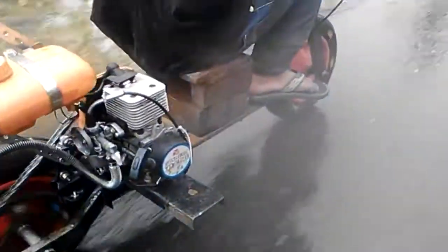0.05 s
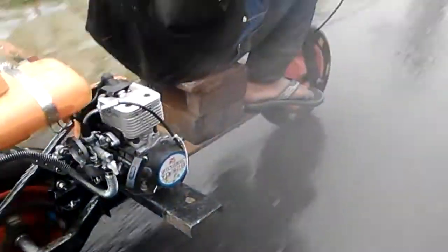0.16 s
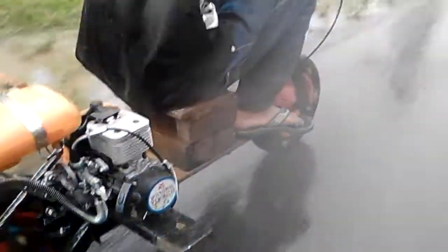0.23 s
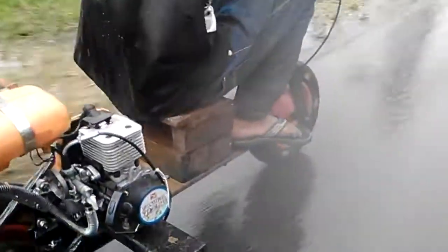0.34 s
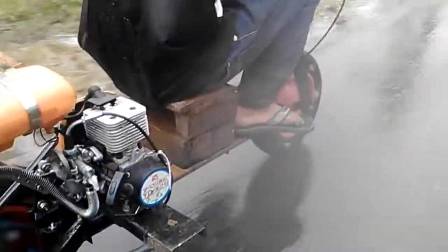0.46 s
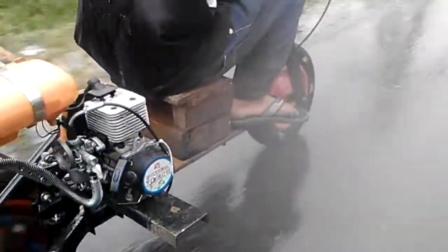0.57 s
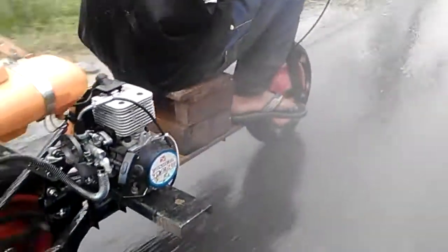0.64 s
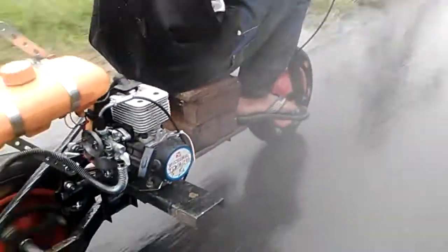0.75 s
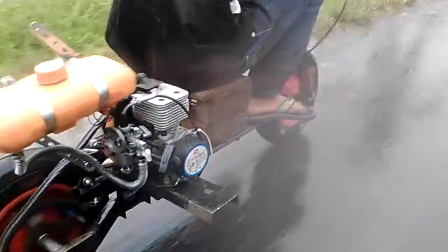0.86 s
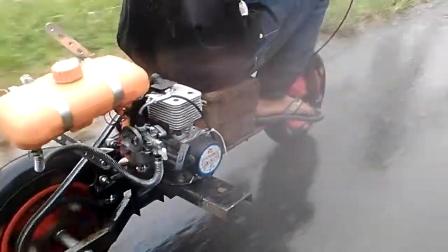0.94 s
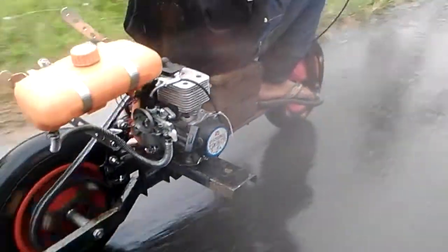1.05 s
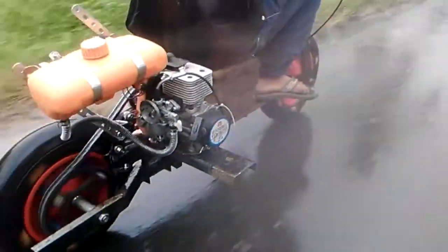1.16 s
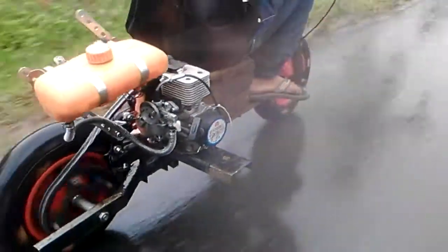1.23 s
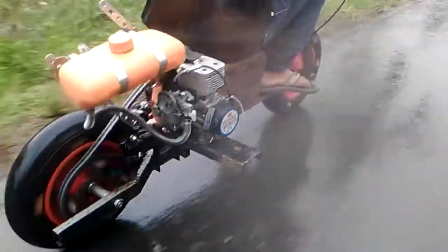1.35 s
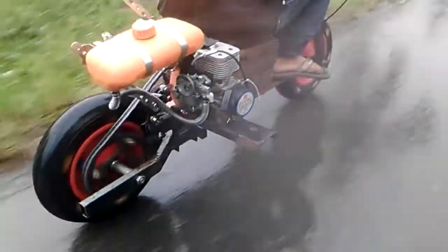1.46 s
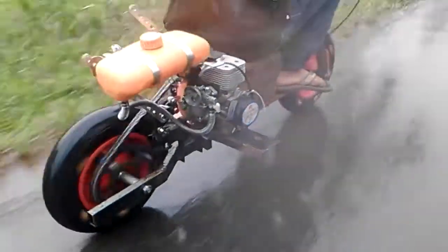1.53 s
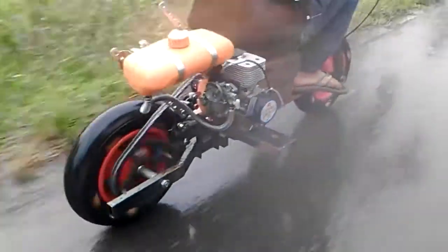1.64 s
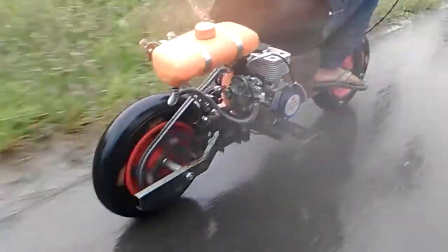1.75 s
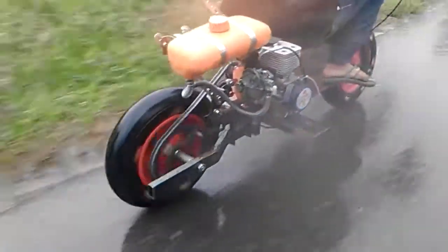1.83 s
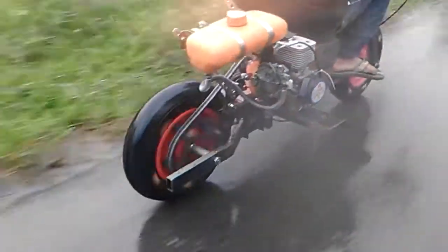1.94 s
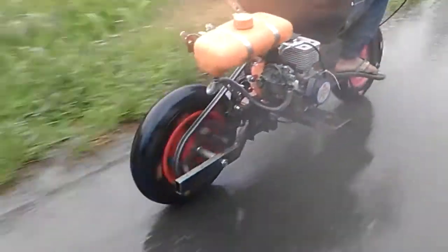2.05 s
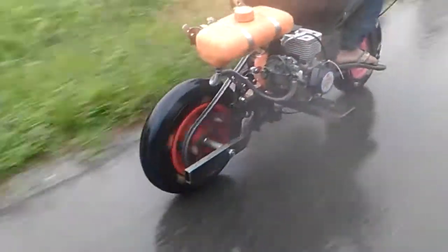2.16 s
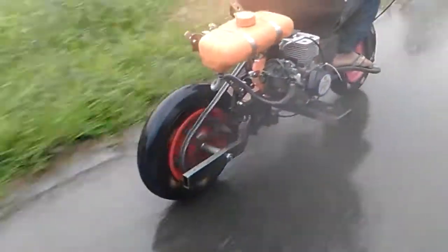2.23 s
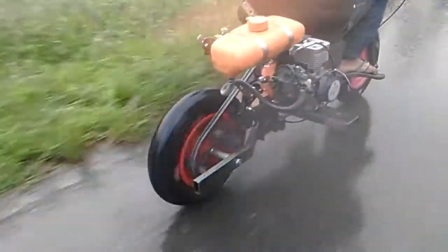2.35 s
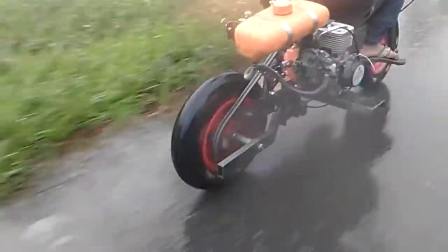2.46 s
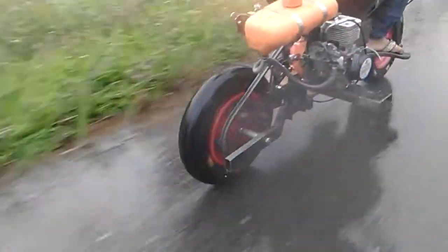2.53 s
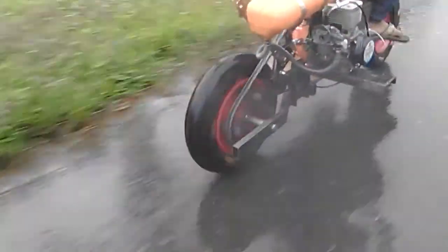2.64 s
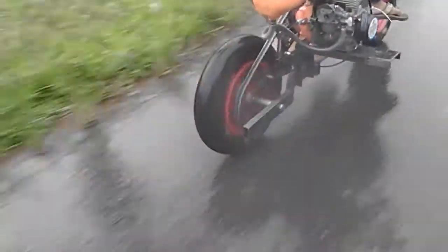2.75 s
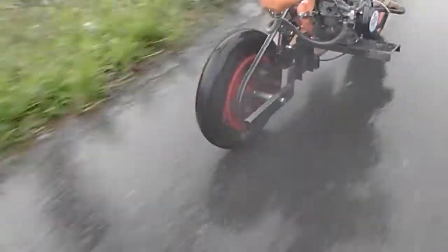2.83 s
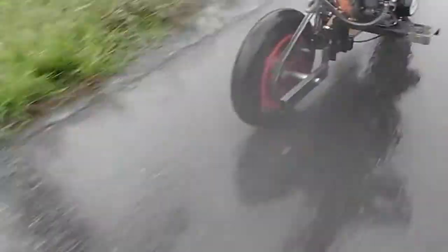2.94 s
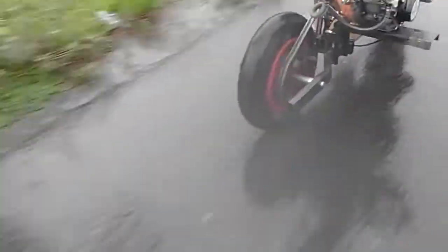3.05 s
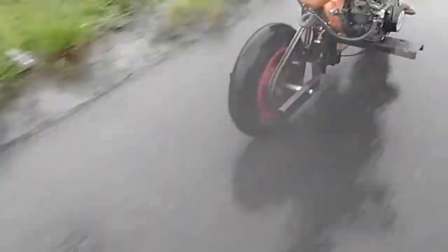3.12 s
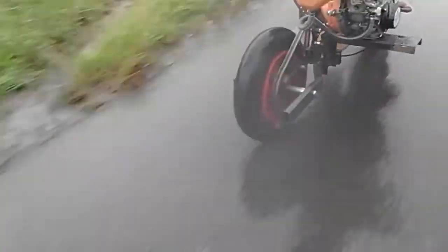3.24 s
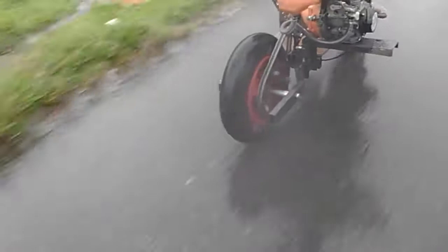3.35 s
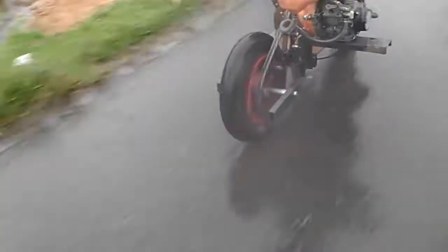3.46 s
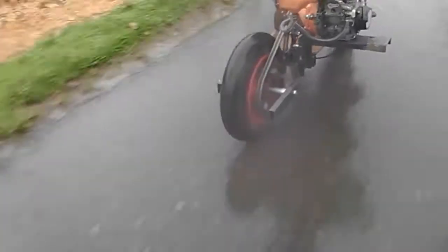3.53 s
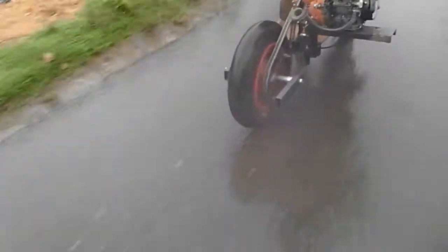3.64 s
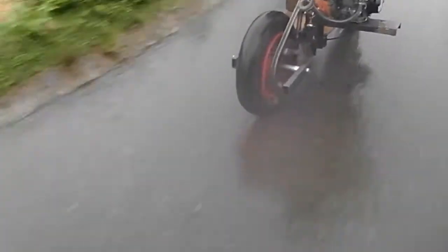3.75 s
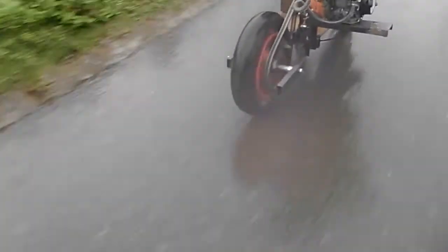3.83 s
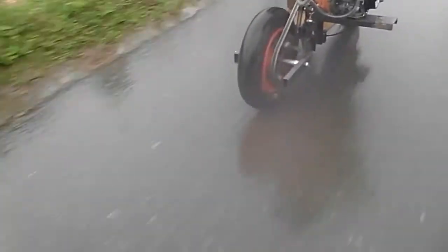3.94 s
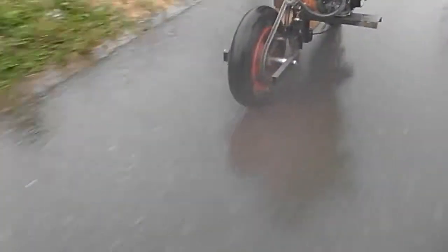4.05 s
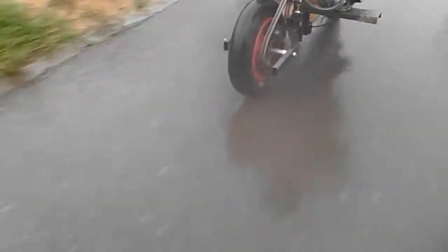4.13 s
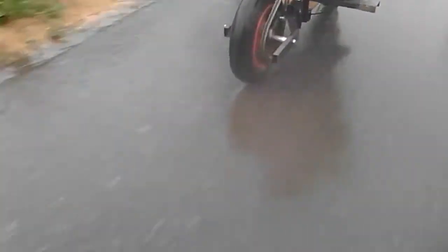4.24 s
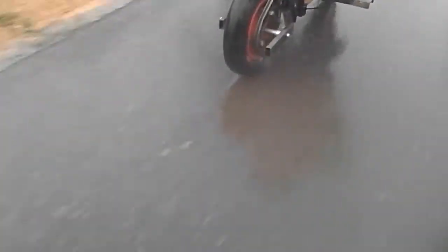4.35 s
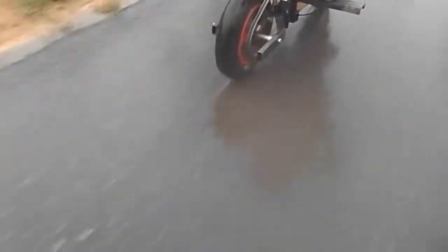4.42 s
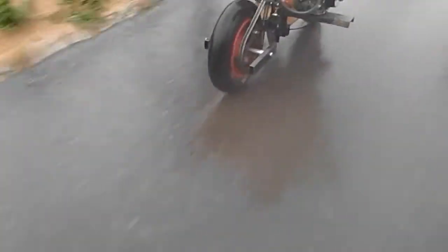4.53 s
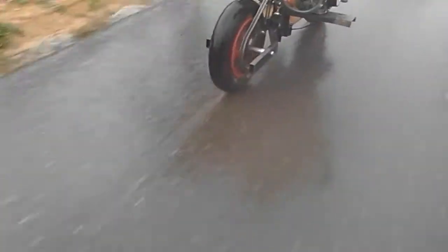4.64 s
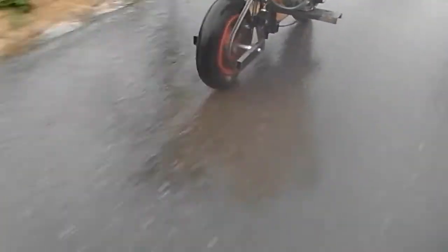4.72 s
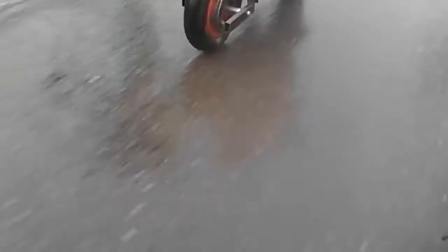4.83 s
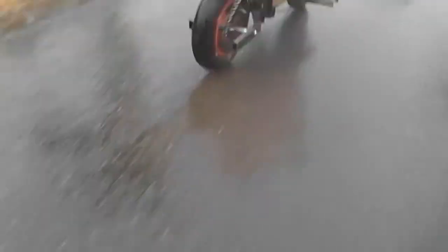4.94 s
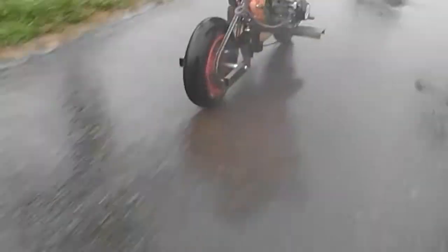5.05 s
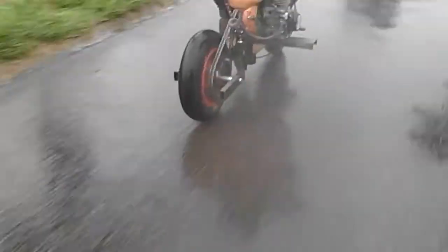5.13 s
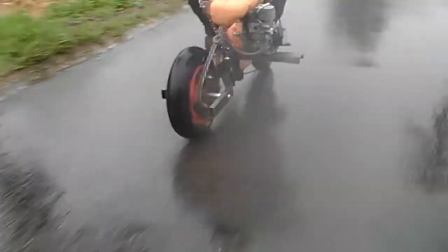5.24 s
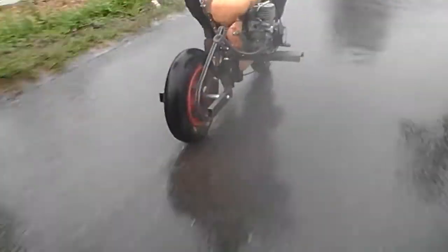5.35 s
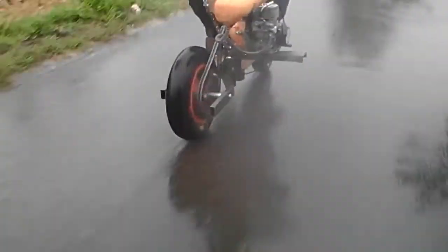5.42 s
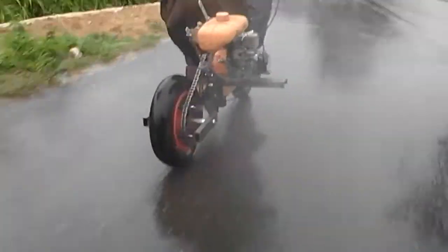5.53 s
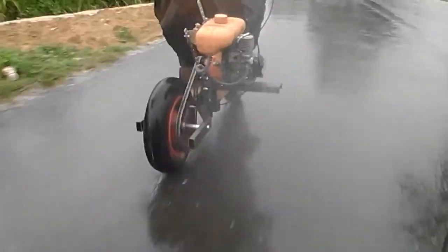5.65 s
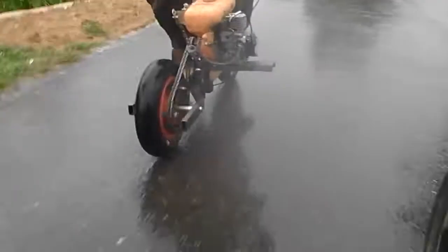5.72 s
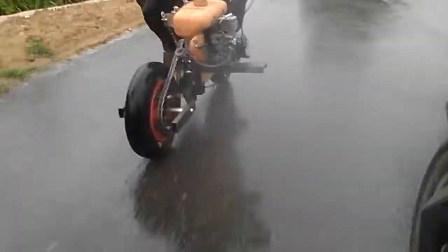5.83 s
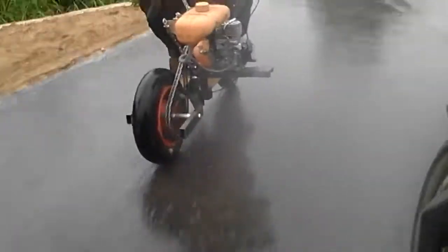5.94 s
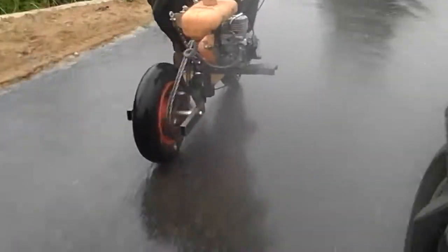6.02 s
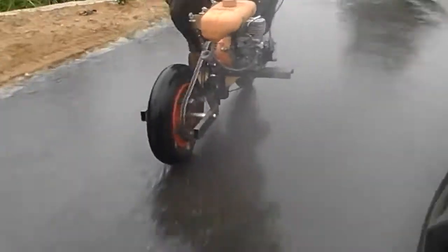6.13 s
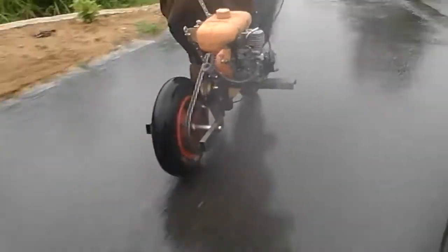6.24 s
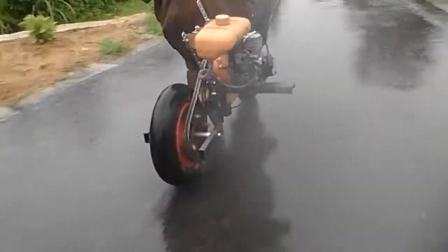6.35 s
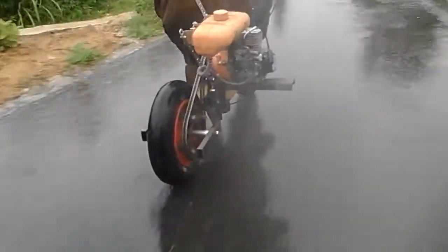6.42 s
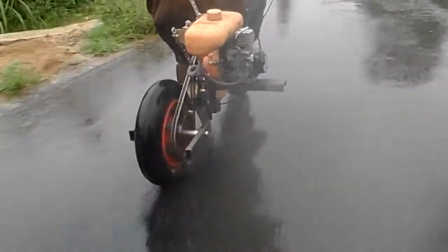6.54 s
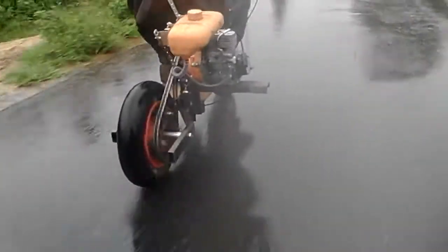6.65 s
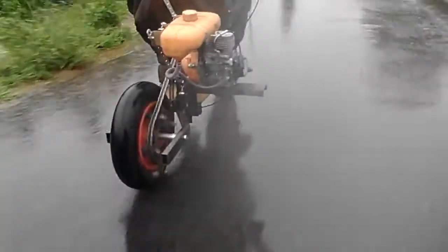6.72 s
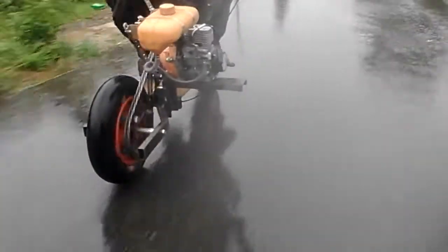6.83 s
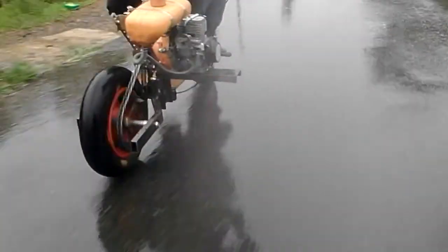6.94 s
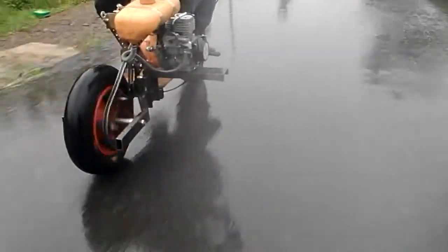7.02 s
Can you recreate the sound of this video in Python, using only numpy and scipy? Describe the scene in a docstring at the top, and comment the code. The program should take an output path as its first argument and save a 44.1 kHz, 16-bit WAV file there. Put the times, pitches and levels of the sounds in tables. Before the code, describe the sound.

A small single-cylinder engine barks harshly close beside its exhaust, then softens to a steady low drone amid wind buffeting and wet tyre hiss.

```python
"""The bark of a grass-cutter engine, close beside its exhaust, opens the ride of a homemade scooter on a wet road.
The engine fires about 56 times a second, and each firing is a puff and a rush of gas that ring the muffler.
The microphone rides along and pulls ahead, so the resonances change level and the bark fades to a drone.
Wind is shaped noise with gusts, the tyres are a fluttering hiss of noise, and the frame rings with one knock."""
import sys
import numpy as np
from scipy import signal
from scipy.fft import rfft, irfft
from scipy.io import wavfile

SR = 44100
rng = np.random.default_rng(int(sys.argv[2]) if len(sys.argv) > 2 else 0)


def transcribe(u):
    """Save the signal u as a 16-bit wav file named by the first command-line argument.

    u: samples, shape (n,) or (channels, n), limited to [-1, 1]; the rate is SR.
    q: integer samples, one column per channel.
    """
    v = np.clip(np.atleast_2d(u).T, -1, 1)
    q = np.round(v * 32767).astype(np.int16)
    wavfile.write(sys.argv[1], SR, q)


N = 312228  # length in samples, about 7 s


def amp(db):
    """Turns decibels into a gain."""
    return 10 ** (np.asarray(db) / 20)


def unit(x):
    """Scales a signal or spectrum to an rms of 1."""
    return x / np.sqrt(np.mean(abs(x) ** 2) + 1e-20)


def at_time(table, t, column=1):
    """Reads one column of a table at the times t, with straight lines between the rows."""
    rows = np.array(table)
    return np.interp(t, rows[:, 0], rows[:, column])


def at_hz(table, hz):
    """Reads a two-column table at the frequencies hz, on a logarithmic pitch axis."""
    table_hz, value = np.transpose(table)
    return np.interp(np.log(hz + 1), np.log(table_hz + 1), value)


def coloured(x, spectrum):
    """Filters a full-length signal by a spectrum in dB."""
    gain = amp(at_hz(spectrum, np.fft.rfftfreq(N, 1 / SR)))
    return irfft(rfft(x) * gain, N)


def drift(count, size):
    """Makes a smooth random curve of rms 1 that changes over about size steps."""
    noise = rng.standard_normal(count + size - 1)
    return unit(signal.fftconvolve(noise, np.hanning(size), "valid"))


def arch(t, middle_s, length_s):
    """Rises smoothly from 0 to 1 and falls back."""
    return np.cos(np.pi * np.clip((t - middle_s) / length_s, -.5, .5)) ** 2


# The steady airstream at the microphone.
# Each row: time in seconds, level in dB before the trims in wind(), raising of its deep bass in dB.
AIRSTREAM = [(0, -25.5, -1.5), (.7, -26, -1), (1, -32.5, -2), (2.3, -31.5, 3), (3.2, -30, 2), (4.1, -33, 9),
             (5.1, -31, -11), (5.6, -32.5, -15), (6.2, -30, -16), (7.08, -31.5, -4)]
# Gusts that strike on top of the airstream.
# Each row: middle in seconds, length in seconds, level in dB before the same trims.
GUSTS = [(.47, 0.12, -28), (2.738, 0.15, -25), (3.215, .18, -28.5), (3.682, 0.18, -28.5), (3.87, 0.33, -30),
         (4.095, 0.32, -29), (4.385, 0.067, -31), (4.565, 0.067, -29), (4.882, .1, -31), (5.206, 0.12, -21),
         (5.299, 0.13, -23), (6.012, 0.15, -20.5), (6.297, .1, -26.5), (6.684, 0.075, -24.5),
         (6.79, 0.11, -21), (7.042, 0.036, -30)]
# Colour of the wind's rumble. Each row: frequency in Hz, relative level in dB per Hz.
RUMBLE_COLOUR = [(15, -16), (38, -12), (62, 1), (90, -1.5), (125, 1), (160, -1), (230, -7), (350, -10),
                 (500, -17.5), (900, -24.5), (2000, -64.5), (5000, -75)]
# The deep part of the rumble. Each row: frequency in Hz, gain in dB.
SUB_BASS = [(45, -4.5), (60, -10.5), (80, -17), (120, -40), (300, -80.5)]
# Colour of the hollow boom in strong gusts. Each row: frequency in Hz, relative level in dB per Hz.
BOOM_COLOUR = [(30, -34), (70, -13.5), (110, -1), (150, 7), (200, -10), (300, -15), (600, -34.5),
               (2000, -66)]
FULL_BOOM_DB = -18  # strength of wind at which the boom is fully raised; stronger wind raises it further


def wind(rumble_db=-0.2, lumps_db=1.92, boom_db=0.5):
    """Eddies thump on the microphone port; in dB, the boom grows twice as fast as the rumble."""
    t = np.arange(N) / SR
    stream = amp(at_time(AIRSTREAM, t) + lumps_db * drift(N, size=4000))
    gust_power = sum(amp(db) ** 2 * arch(t, middle_s, length_s) for middle_s, length_s, db in GUSTS)
    strength = np.sqrt(stream ** 2 + gust_power)

    rumble = unit(coloured(rng.standard_normal(N), RUMBLE_COLOUR))
    extra_bass = amp(at_time(AIRSTREAM, t, column=2)) - 1  # negative takes bass away
    rumble = rumble + extra_bass * coloured(rumble, SUB_BASS)

    boom = unit(coloured(rng.standard_normal(N), BOOM_COLOUR))
    boom_rise = strength / amp(FULL_BOOM_DB)
    return strength * (amp(rumble_db) * rumble + amp(boom_db) * boom_rise * boom)


# Loudness of the tyres on the wet road. Each row: time in seconds, average level in dB.
TYRES = [(0, -35), (.8, -36.5), (1.5, -41.5), (3, -48), (4.2, -47), (4.8, -46), (5.4, -44.5), (5.9, -42),
         (6.4, -41), (7.08, -42)]
# Colour of the tyre hiss. Each row: frequency in Hz, relative level in dB per Hz.
TYRE_COLOUR = [(100, -10.5), (400, 5), (1000, 2), (1500, -0.5), (2200, -15.5), (3200, -14), (5000, -27),
               (7000, -30.5), (10000, -26)]


def tyres(flutter_db=1.5):
    """Rolling noise and spray hiss, fluttering with the film of water."""
    spray = unit(coloured(rng.standard_normal(N), TYRE_COLOUR))
    level_db = at_time(TYRES, np.arange(N) / SR) + flutter_db * drift(N, size=1500)
    return spray * amp(level_db)


# Knocks of the frame. Each row: start in seconds, peak level in dB.
KNOCKS = [(5.292, -34)]
# What the frame rings with. Each row: frequency in Hz, relative level in dB, time to fall by 60 dB in seconds.
FRAME = [(1320, -6, 0.014), (2070, 2, 0.042), (2260, 3, .025), (2610, 5, 0.027), (3770, -1, 0.022)]


def knocks(contact_s=0.013):
    """A loose part chatters briefly against the frame: a dying burst of noise makes the frame ring."""
    t = np.arange(SR // 4) / SR
    ring = sum(amp(db - 60 * t / t60) * np.sin(2 * np.pi * hz * t) for hz, db, t60 in FRAME)
    out = np.zeros(N)
    for start_s, db in KNOCKS:
        chatter = rng.standard_normal(len(t)) * np.exp(-t / contact_s)
        knock = signal.fftconvolve(ring, chatter)[:len(t)]
        out[round(start_s * SR):][:len(t)] += amp(db) * knock / abs(knock).max()
    return out


# Crank speed, held almost steady by the rider. Each row: time in seconds, speed in firings a second.
SPEED = [(0.0, 56.55), (0.95, 56.19), (1.3, 56.4), (2.6, 56.42), (3.1, 56.18), (3.5, 56.45), (4.4, 56.36),
         (5.3, 56.24), (6.1, 56.07), (6.45, 56.52), (6.85, 55.92), (7.08, 56.05)]
FIRST_FIRING_TURN = .102  # turns of the crank before the first firing


def firing_times(jitter_s=.00004):
    """The engine fires once each turn of the crank, never quite on time."""
    t = np.arange(N + 2000) / SR
    turns = np.cumsum(at_time(SPEED, t)) / SR - FIRST_FIRING_TURN
    times = np.interp(np.arange(int(turns[-1])), turns, t)
    return times + jitter_s * rng.standard_normal(len(times))


def peak(hz, centre_hz, width_hz):
    """Power response of one resonance with steep skirts, down to an eighth at width_hz from its centre."""
    return (1 + ((hz - centre_hz) / width_hz) ** 2) ** -3


def ringing(gain, abruptness):
    """Gives each row of gains its phase: 1 = struck at once and dying away, 0 = swelling as slowly as it dies."""
    # folding the cepstrum gives the phase of the most abrupt ring with these gains
    cepstrum = irfft(np.log(np.maximum(gain, 1e-5)))
    half = cepstrum.shape[1] // 2
    cepstrum[:, 1:half] *= 2
    cepstrum[:, half + 1:] = 0
    struck_phase = rfft(cepstrum).imag
    return gain * np.exp(1j * np.clip(abruptness, 0, 1) * struck_phase)


# Where the microphone rides. Each row: time in seconds, bearing from 0 (beside the exhaust)
# to 4 (ahead of the scooter), gain for closeness in dB, change of treble in dB.
# beam() reads the bearing; so does travel(), and muffler() reads the rest.
RIDE = [(0.0, 0.21, 3.5, -5.2), (0.5, 0.0, -0.75, -7), (0.8, 0.22, -0.74, -5.5), (1.1, 0.82, -1.5, 3),
        (1.4, 0.68, -4, 5), (1.8, 1.71, -0.5, 4), (2.2, 1.49, -1, 3), (2.6, 2.04, 0, 2),
        (3.2, 1.9, -3, 4.5), (3.8, 2.5, -1.5, 2), (4.4, 2.5, -4, 0.5), (5.0, 3, -4, -0.5),
        (5.7, 3, -5.5, 5), (6.05, 3, -3.5, 1), (6.3, 4, -3, 0.5), (7.08, 4.5, -2.3, 4)]
# A resonance swells as the microphone crosses its beam.
# Each row: middle in seconds, length in seconds, resonance in Hz, rise in dB.
SWELLS = [(.9, 0.22, 2657, 7), (1.003, 0.59, 896, 5.5), (1.05, 1.1, 1653, 4.5), (1.17, 0.22, 3394, 14),
          (1.25, 0.42, 4090, 3.5), (1.293, 0.76, 1270, 5), (1.847, 0.66, 2657, 8), (2.05, 1.46, 3394, 12),
          (3.5, .6, 1270, 6.5), (3.95, 2.4, 1653, 6.5), (4.05, 1.5, 896, 7), (4.6, 0.87, 3394, 6),
          (5.8, 1.5, 4782, 6.5), (6.003, 0.87, 4090, 2.5), (6.11, 0.97, 1270, 7)]


def beam(times, centre_hz, levels_db):
    """Level in dB of one resonance at each firing, as heard from the bearing of that moment."""
    swell_db = sum(db * arch(times, middle_s, length_s) for middle_s, length_s, hz, db in SWELLS
                   if abs(hz - centre_hz) < centre_hz / 12)  # only swells near this resonance
    bearing = at_time(RIDE, times)
    return np.interp(bearing, np.arange(len(levels_db)), levels_db) + swell_db


# Four narrow rings of the pipe and cooling fins. Each row: frequency in Hz, width in Hz before sharpening,
# share of the glide, then relative level in dB heard from bearing 0, 1, 2, 3 and 4.
RINGS = [(1647, 127, 0, -28, -36, -50.5, -52.5, -43.5), (2648, 190, 0.32, -44, -39.5, -54.5, -70, -72.5),
         (3408, 260, 0.85, -44, -51.5, -57.5, -54.5, -48.5),
         (4826, 260, .15, -44.5, -58.5, -58.5, -55, -56.5)]
# The rings shift in pitch as the microphone moves. Each row: time in seconds, full shift in Hz.
GLIDE = [(0, 222), (.7, 237), (1, -13), (1.8, -18.5), (2.4, 88.5), (3, 286), (3.9, 401), (4.5, 2),
         (5.2, 35), (5.75, 248), (6.2, -8), (7.08, 20)]


def rings(times, hz, level_db=10.0, sharpness=1.29):
    """Gain of the narrow rings at each firing; each beams its own way and spreads over its width."""
    power = 0
    for ring_hz, width_hz, share, *levels_db in RINGS:
        level = amp(level_db + beam(times, ring_hz, levels_db))[:, None]
        centre_hz = ring_hz + share * at_time(GLIDE, times)[:, None]
        spread = 250 * sharpness / width_hz  # a narrower ring stands taller
        power = power + level ** 2 * peak(hz, centre_hz, width_hz / sharpness) * spread
    return np.sqrt(power)


# Resonances of muffler, pipe and engine case. Each row: frequency in Hz, width in Hz,
# then relative level in dB heard from bearing 0, 1, 2, 3 and 4.
MUFFLER = [(55, 8.2, -25.5, -16.5, -27, -22, -30.5), (176.3, 44.3, -7.5, -9.5, -14, -13, -14.5),
           (294.6, 56, -27.5, -13.5, -19.5, -16, -17.5), (351.7, 92, -4, -25, -24, -13.5, -16.5),
           (480.8, 36, 1, -12, -24.5, -45, -40), (590, 53.6, -3.5, 0, -14, -22, -20.5),
           (729.4, 93.6, -28, -10, -10.5, -14.5, -11), (796, 41, -24.5, -25, -16, -20, -16),
           (896.3, 64.3, 2, -21.5, -23, -22, -44), (1063, 58, -11, -48, -32.5, -24.5, -26),
           (1269, 205, -15.5, -30, -39, -34, -45), (2076, 120, -28.5, -48.5, -57, -42.5, -45.5),
           (2360, 340, -52.5, -56, -50, -51.5, -52), (4034, 413, -31.5, -46.5, -55.5, -46, -49),
           (5340, 480, -33, -52.5, -58, -60, -63), (6120, 590, -57.5, -48.5, -55.5, -59, -56),
           (7080, 1120, -36, -59, -63.5, -60, -64.5)]


def muffler(times, hz, body_db=0.0, wander_db=4.5):
    """Response from exhaust port to microphone at each firing; every resonance beams its own way."""
    modes = np.array(MUFFLER)
    closeness_db = at_time(RIDE, times, column=2)
    treble_db = at_time(RIDE, times, column=3)
    mode_db = np.array([beam(times, row[0], row[2:]) for row in modes]).T
    gain = np.sqrt(amp(mode_db) ** 2 @ peak(hz, modes[:, :1], modes[:, 1:2]))

    # short waves wander in strength as the reflections off road and rider shift
    patches = rng.standard_normal((len(times), len(hz)))
    smoothing = np.outer(np.hanning(45), np.hanning(13))  # over firings and over pitch
    wander = unit(signal.fftconvolve(patches, smoothing, "same"))
    treble = hz ** 4 / (hz ** 4 + 1800 ** 4)  # 0 in the bass, 1 in the treble
    body = gain * amp(body_db + treble * (treble_db[:, None] + wander_db * wander))

    response = ringing(body, abruptness=.3) + ringing(rings(times, hz), abruptness=0.58)
    return amp(closeness_db)[:, None] * response


# Mean delay of each pitch on its way to the microphone. Beside the exhaust the pitches near 270 to 770 Hz
# and 2700 Hz come early, except near 580 Hz, and those near 1200 Hz come late.
# Each row: frequency in Hz, delay in seconds beside the exhaust, delay in seconds ahead of the scooter.
TRAVEL = [(100, 0.0011, .0015), (269, 0.00069, 0.002), (460, 0.00074, .0053), (580, 0.0024, 0.0048),
          (765, .0008, 0.0029), (900, 0.0018, 0.0002), (1190, 0.0034, 0.0025), (1632, .003, .0031),
          (2710, 0.00039, .0021), (3980, .0008, 0.0018), (6400, 0.0021, 0.0031)]
AHEAD_BEARING = 2.87  # from here on the sound comes round the front of the engine


def travel(times, hz):
    """Delay of each pitch at each firing; it shifts as the microphone moves ahead."""
    beside, ahead = (at_hz([(row[0], row[k]) for row in TRAVEL], hz) for k in (1, 2))
    progress = np.clip(at_time(RIDE, times) / AHEAD_BEARING, 0, 1)[:, None]
    return beside + (ahead - beside) * progress


# Turbulent part of each exhaust puff. Each row: frequency in Hz, share of its amplitude from 0 to 1.
TURBULENCE = [(100, 0.2), (600, 0.16), (1000, 0.22), (1700, 0.17), (3000, 0.54), (5000, 0.62), (8000, 0.84)]
# Time over which a puff is scattered by engine and frame. Each row: frequency in Hz, time in seconds.
SCATTER = [(200, 0.00044), (550, 0.0019), (900, 0.0048), (2000, 0.004004), (7000, 0.00387)]


def engine(level_db=35.5, rush_s=0.0011, leak=0.059, uneven_db=0.25, crack_uneven_db=1.43, size=2048):
    """Each firing is a puff and a short rush of gas that ring the muffler."""
    times = firing_times()
    hz, t = np.fft.rfftfreq(size, 1 / SR), np.arange(size) / SR

    # each pitch of the puff arrives by a slightly different path
    scatter_part = (1 + np.tanh(drift(len(hz), size=25) * hz / (hz + 1500))) / 2
    delay = travel(times, hz) + at_hz(SCATTER, hz) * scatter_part
    puff = np.exp(-2j * np.pi * np.cumsum(delay, axis=1) * hz[1])  # delays summed over pitch give the phase

    # the rush swells and dies in a few ms; a little gas leaks on until the next firing
    swell = t / rush_s * np.exp(-t / rush_s) + leak * (t < np.mean(np.diff(times)))
    rush = unit(rfft(rng.standard_normal((len(times), size)) * swell))
    share = np.clip(at_hz(TURBULENCE, hz), 0, 1)

    # no two charges burn alike, and the treble shows it most
    charge, crack = rng.standard_normal((2, len(times), 1))
    burn_db = uneven_db * charge + crack_uneven_db * crack * hz / (hz + 2000)
    drive = amp(level_db + burn_db) * (np.sqrt(1 - share ** 2) * puff + share * rush)

    # every pop has a lead-in, in which the port opens, and is laid at its exact time
    lead = size // 4
    start, fraction = np.divmod(times * SR, 1)
    shift = np.exp(-2j * np.pi * hz * (lead + fraction[:, None]) / SR)
    pops = irfft(drive * muffler(times, hz) * shift) * signal.windows.tukey(size, .3)
    places = start.astype(int)[:, None] + np.arange(size)
    return np.bincount(places.ravel(), pops.ravel())[lead:lead + N]


def scene():
    """Adds wind, road, frame and engine at one microphone."""
    return (wind() + tyres() + knocks() + engine())[None]


# Treble response of the microphone. Each row: frequency in Hz, gain in dB.
MICROPHONE = [(5000, 1), (7000, -3.5), (7800, -8.5), (8500, -9.5), (10000, -15.5), (16000, -45.5)]
CUTOFF_HZ = 15800


def record(dry, hiss_db=-76):
    """A dull microphone with faint hiss, then a limit on peaks near full scale, then the band limit."""
    heard = coloured(dry[0], MICROPHONE) + amp(hiss_db) * rng.standard_normal(N)
    clipped = heard / (1 + heard ** 40) ** (1 / 40)
    lowpass = signal.firwin(511, CUTOFF_HZ, window=("kaiser", 9), fs=SR)
    return signal.oaconvolve(clipped, lowpass, "same")[None]


dry = scene()
out = record(dry)
transcribe(out)
```